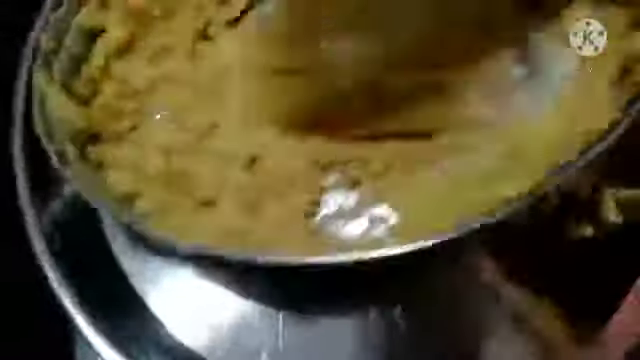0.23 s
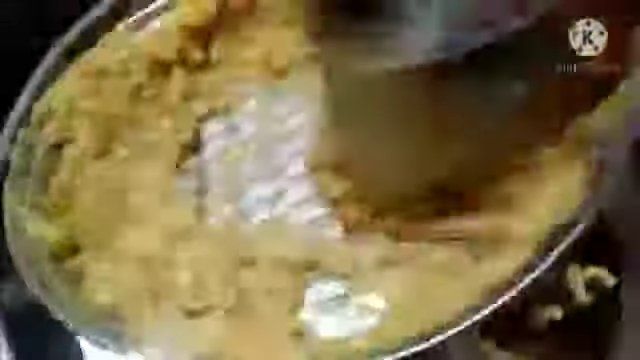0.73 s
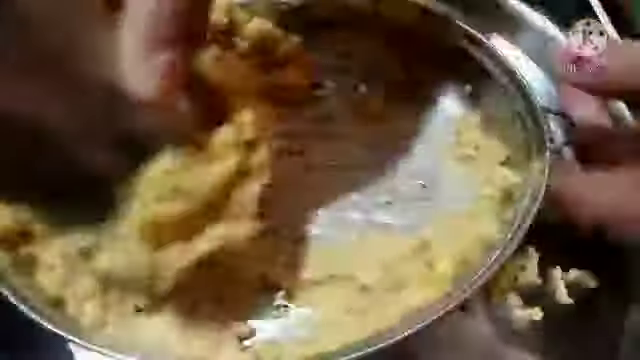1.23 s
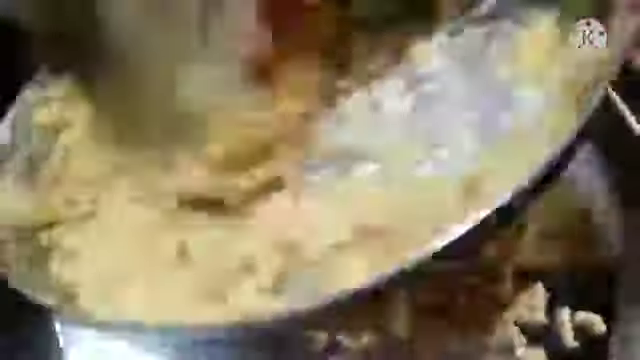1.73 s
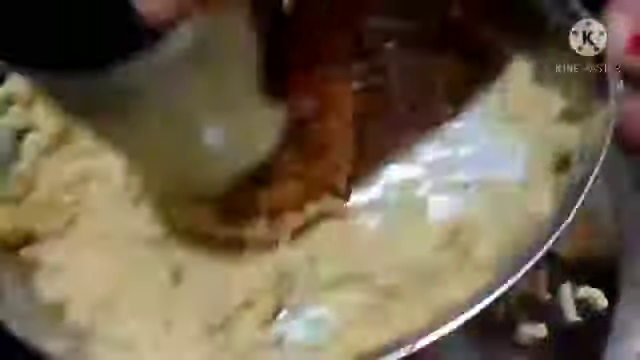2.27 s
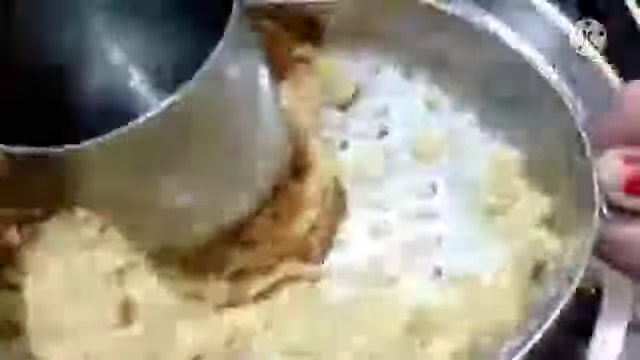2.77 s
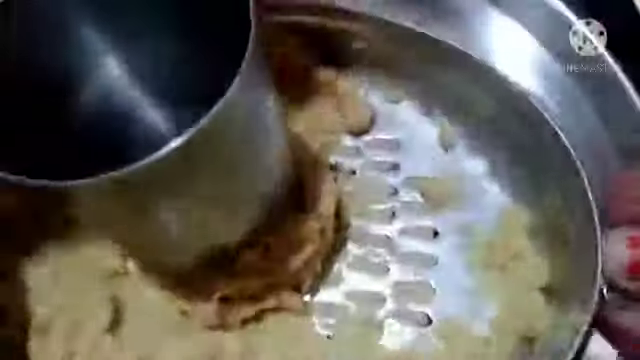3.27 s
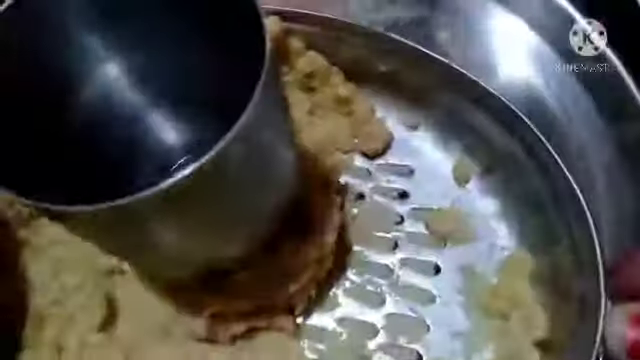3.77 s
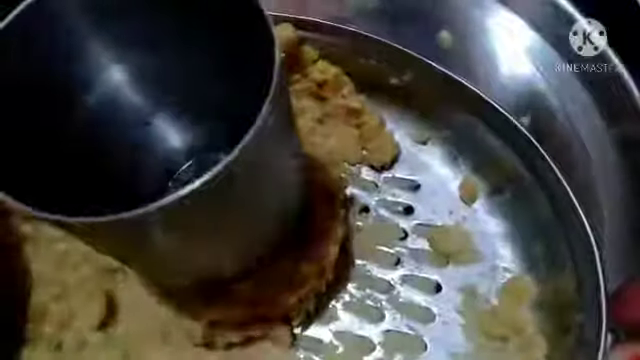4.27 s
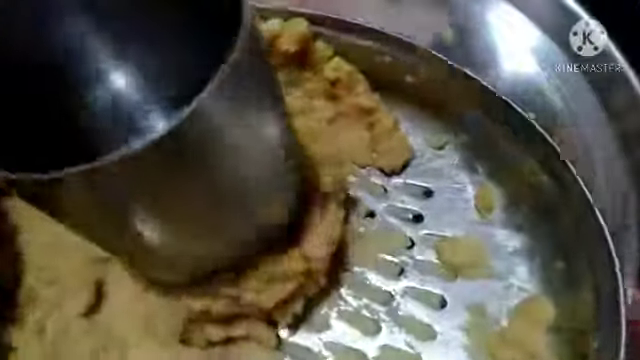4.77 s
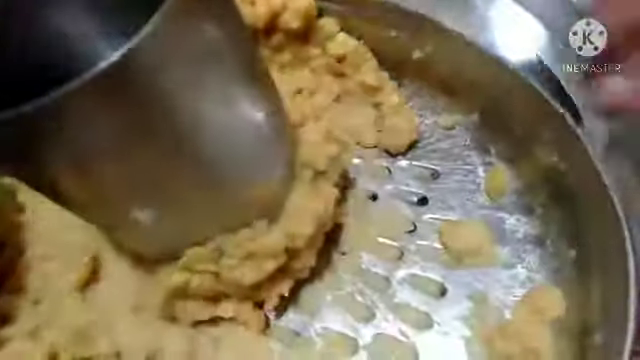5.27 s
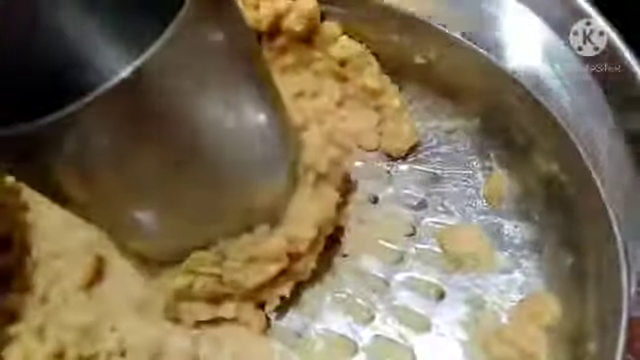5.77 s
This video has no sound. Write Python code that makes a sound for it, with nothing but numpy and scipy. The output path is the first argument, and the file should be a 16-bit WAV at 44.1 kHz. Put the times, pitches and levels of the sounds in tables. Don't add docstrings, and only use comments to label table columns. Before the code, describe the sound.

Fast back-and-forth scraping, gritty and bright, with squeaky chirps across metal holes and a hard knock just before one second. After a short lull, uneven scraping resumes with damped steel clanks and sticky ticks. It thins to low room hum, then five strong raps make the sieve and rim ring. Small ticks and a short scrape end in a dull knock, heard closely in a reverberant kitchen.

```python
import sys
import numpy as np
from scipy import signal
from scipy.fft import rfft, irfft
from scipy.io import wavfile
from scipy.ndimage import uniform_filter1d

SR = 44100
rng = np.random.default_rng(int(sys.argv[2]) if len(sys.argv) > 2 else 0)


def store_pcm(level_fs):
    pcm = np.round(np.clip(level_fs, -1, 1) * 32767).astype(np.int16)
    wavfile.write(sys.argv[1], SR, np.atleast_2d(pcm).T)


def boost(x):
    u = np.asarray(x, float) / 20
    return 10 ** u


N = 265041

# (time [s], length [s], place of most pressure [0-1], friction hiss [dB], sieve floor rumble [dB])
STROKES = [(-.04, 0.16, 0.42, -45.5, -55), (0.091, 0.16, 0.55, -45, -52.5), (0.218, 0.18, 0.37, -45, -54),
           (0.365, 0.22, 0.33, -46.5, -52.5), (0.521, 0.16, 0.35, -40, -46),
           (0.637, 0.17, 0.61, -43, -49.5), (0.788, 0.27, 0.11, -42, -53.5), (0.866, 0.62, 0, -63.5, -74.5),
           (1.232, 0.28, 0.27, -66, -67.5), (1.349, 0.24, 0.15, -50.5, -65),
           (1.483, 0.14, 0.44, -51, -56.5), (1.567, 0.27, 0, -49.5, -51.5), (1.733, 0.22, 0.59, -48, -54.5),
           (1.891, 0.21, 0.51, -51, -58.5), (2.013, 0.23, 0.3, -48, -49.5), (2.177, 0.08, 0.4, -51, -61),
           (2.225, 0.074, 0.65, -54, -63.5), (2.287, 0.27, 0.1, -55.5, -63),
           (4.614, 0.49, 0.21, -75.5, -70.5), (5.16, 0.31, 0.07, -67.5, -71),
           (5.264, 0.22, 0.55, -48, -65.5), (5.402, 0.1, 0.52, -43.5, -59.5),
           (5.478, 0.19, 0.1, -50.5, -68), (5.925, 0.16, 0.31, -56.5, -76)]
# (frequency [Hz], density [dB per Hz])
GRIT_SPECTRUM = [(1470, -45), (2500, -3), (2910, -8), (4470, -2.5), (5700, -1.5), (6300, 7.5), (7340, 3),
                 (12100, -7.5), (14900, -5.5), (15500, 6)]
# (frequency [Hz], level [dB], t60 [s])
SIEVE_MODES = [(997, -20, 0.71), (2350, -20, 0.46), (3400, -11, 0.35), (4680, -20.5, .4), (4460, -2, 0.41),
               (5130, 0, 0.4), (6300, -18, 0.497), (5850, -19, .3), (6110, -6.5, 0.27), (6580, -2.5, 0.2),
               (7060, -3, 0.29), (7160, -26.5, 0.16), (9330, -3, .3), (10240, -16, .3),
               (12930, -25.5, 0.14), (11450, -6.5, 0.22), (13700, 3, 0.16)]

# (time [s], length [s], place of most pressure [0-1], level [dB])
SWEEPS = [(-.03, 0.12, .45, -57), (.1, .14, .5, -58), (.23, .15, .4, -59), (.803, .08, .1, -53),
          (5.292, .12, 0.19, -55), (5.34, .12, .4, -50.5), (5.43, .15, .5, -53), (5.54, .14, .15, -60),
          (5.945, .12, .4, -61)]
# (frequency [Hz], density [dB per Hz])
BARE_SPECTRUM = [(4300, -31), (5200, -3), (7000, -3), (9000, 0.5), (12000, -4), (14000, -1), (15600, 4.5)]

# (time [s], length [s], first rate [Hz], level [dB])
SPEEDING_CHIRPS = [(0.419, 0.034, 516, -54), (0.451, 0.033, 1100, -41.5), (0.724, 0.018, 672, -47),
                   (0.728, 0.038, 1048, -42.5), (1.844, 0.0644, 500, -48.5), (2.096, 0.04, 484, -42.5),
                   (2.122, 0.0067, 707, -36)]
SLOWING_CHIRPS = [(0, 0.017, 1740, -48), (0.268, 0.038, 1796, -45.5), (0.289, 0.046, 892, -51),
                  (0.553, 0.036, 1758, -37), (0.593, 0.0163, 580, -47.5), (0.818, 0.037, 1573, -42.5),
                  (1.978, 0.0097, 586, -47)]
SLIDING_CHIRPS = [(.015, 0.015, 760, -49), (0.029, 0.025, 1480, -46.5), (0.132, 0.016, 1480, -45),
                  (0.143, 0.018, 626, -48), (0.18, 0.02, 1380, -52), (0.824, 0.043, 2020, -48),
                  (1.535, 0.014, 1960, -57), (1.893, 0.0143, 1453, -45), (2.085, 0.051, 1427, -48),
                  (5.353, 0.056, 1218, -61), (5.464, 0.05, 1393, -54), (5.4, 0.04, 2300, -58),
                  (0.045, 0.03, 2100, -52), (0.16, 0.03, 2000, -52), (0.3, 0.03, 1400, -50),
                  (0.6, 0.03, 2300, -50), (5.533, 0.029, 1247, -58.5)]
SPEEDING_OCT_PER_S, SLOWING_OCT_PER_S, SLIDING_OCT_PER_S = 22, -18.5, -1.8

# (time [s], peak [dB], weight behind the blow [dB], room send [dB])
HARD_RAPS = [
    (3.7818, -23.5, 3.5, 2.5),
    (3.9421, -22.5, 0, 0),
    (4.0981, -21, 0, 4),
    (4.2655, -24, -1, 4),
    (4.4203, -19.5, -3, 2.5),
]
BUMPS = [
    (0.8725, -21, 0.33, -18),
    (1.592, -41, 14, -37),
    (1.9794, -57, 21, -27),
    (1.9946, -45, 10.6, -30),
    (3.2922, -45.5, 11, 6),
    (4.115, -36.5, 0.69, -18.5),
]
THUMPS = [
    (2.126, -46.5, 13, -3),
    (3.3072, -39.5, 7.9, 2),
    (3.7735, -52.5, 23, -2.5),
    (6.005, -29.5, 8, -10.5),
]
CLANKS = [(1.5773, -28.5, 9.5, -22.5), (1.6435, -40.5, 11, -11), (2.299, -33, 8, -6),
          (3.0114, -46, 2, -26.5), (3.0766, -52, 4, -20), (1.513, -49, 8, -10), (1.822, -48, 2, -10),
          (1.838, -57, 3, -10), (5.457, -39.5, 3, 0)]
SHARP_CLICKS = [(0.1366, -45.5, 3, 4), (0.835, -37.5, 11.5, 4.5), (0.9033, -39, -5, -24),
                (1.3718, -27.5, 8.5, -42.5), (2.0233, -31, 17.5, -14), (3.016, -42, 8, 7),
                (5.5055, -42, -3, -18), (5.5443, -30, -10, -14)]
DULL_CLICKS = [(0.4629, -33, 7, -21), (0.569, -30.5, -11, -10), (0.8823, -26.5, 8, -24),
               (0.887, -40.5, -13, 11), (1.338, -42.5, 9.5, -7), (1.4216, -33, -2, -24),
               (4.1439, -29.5, 11, 5.5)]
# (under 1.5 kHz [dB], 1.5-4.5 kHz [dB], over 9 kHz [dB])
RAP_COLOUR = (-2.5, 2.7, -5.5)
BUMP_COLOUR = (-1, -2.1, -5.5)
THUMP_COLOUR = (0, -22, -11)
CLANK_COLOUR = (-17.5, 0, -11.5)
SHARP_COLOUR = (-19, -12.5, -6.5)
DULL_COLOUR = (-15.5, -24, -12)

# (time [s], height [dB], frequency [Hz])
LONG_RINGS = [(0.44, -58, 4160), (0.462, -49.5, 4170), (1.585, -55, 3710), (1.6, -55, 4100),
              (1.645, -59, 5400), (3.79, -44, 991), (3.8, -47.5, 2890), (3.79, -42.5, 3370),
              (3.95, -44.5, 2680), (4.11, -46, 3370), (4.28, -49.5, 3050)]
SMEARED_RINGS = [(.875, -39, 6300), (2.3, -48, 3300), (3.018, -46, 3860), (3.05, -50.5, 3560),
                 (3.02, -53, 6500), (3.3, -46.5, 900), (3.305, -49, 5900), (3.79, -46.5, 2230),
                 (3.95, -48, 965), (3.95, -44, 3170), (4.108, -40, 920), (4.13, -46.5, 620),
                 (4.275, -40, 920), (4.275, -47.5, 3250), (4.428, -40, 890), (4.43, -41, 3250)]
FREE_RINGS = [(1.59, -42.5, 3450), (1.76, -55, 2100), (.88, -50, 5400), (3.03, -51, 3830),
              (1.66, -49, 1800), (1.62, -53, 280), (1.62, -53.5, 227), (1.645, -49, 3100),
              (2.022, -43.5, 3360), (3.292, -47, 290)]
HELD_RINGS = [(1.578, -37, 3280), (1.54, -52, 2040), (1.78, -57, 3700), (1.785, -57, 3230),
              (1.85, -54.5, 3960), (2.023, -49, 2818), (2.062, -52, 2497), (2.298, -43.5, 2210),
              (2.298, -40, 3446), (3.02, -50, 5380), (3.02, -46, 6110), (5.457, -45, 3490),
              (5.545, -52, 3510), (3.782, -28.5, 3980), (4.265, -34, 15000), (1.278, -64, 2180)]
MUTED_RINGS = [(0.741, -50, 4240), (3.942, -32, 13200), (2.03, -42, 3050), (5.56, -52, 6100),
               (5.44, -46, 6200), (1.513, -50, 4150), (1.785, -50, 2050), (1.545, -50, 5000),
               (1.278, -50.5, 1060), (2.023, -28, 2110), (2.07, -52, 2150), (2.296, -32, 2970),
               (3.019, -39.5, 4040), (3.291, -35.5, 468), (3.292, -42, 1696), (3.293, -39, 5460),
               (3.773, -32.5, 523), (4.112, -33.5, 485), (4.267, -35.5, 490), (5.258, -54, 625),
               (.874, -41.5, 181), (3.781, -41, 180), (4.098, -45, 194)]
CHOKED_RINGS = [(1.642, -29.5, 2080), (1.643, -32, 2470), (2.025, -22.5, 2466), (3.015, -40, 7800),
                (3.294, -34, 2600), (4.821, -59, 3250), (1.4056, -56, 3860), (1.4784, -56, 3670),
                (6.005, -40, 3550), (6.005, -36, 800), (6.005, -39, 1350)]
LONG_T60_S, SMEARED_T60_S, FREE_T60_S = 0.75, 0.44, 0.42
HELD_T60_S, MUTED_T60_S, CHOKED_T60_S = 0.21, 0.077, 0.055

# (time [s], level [dB])
RAP_RINGS = [
    (3.782, -37),
    (3.941, -42),
    (4.098, -35.5),
    (4.265, -43),
    (4.421, -38),
]
# (frequency [Hz], level [dB], t60 [s])
RIM_MODES = [(3250, -4, 0.3), (4060, -12, .4), (4970, -5, 0.45), (6330, -2, 0.55), (7100, -2, 0.34),
             (7530, -5, 0.36), (8900, -8, 0.33), (10400, -10, 0.26), (11700, -10, 0.28), (13150, -10, .26),
             (14700, -4.5, .26), (15200, -4, .22)]

# (time [s], peak [dB])
TICKS = [(0.737, -30), (0.749, -26.5), (0.7594, -54), (0.856, -20), (1.513, -40.5), (1.5435, -49),
         (1.822, -35.5), (2.2023, -39), (2.214, -40), (2.2507, -38), (2.267, -42), (2.394, -35.5),
         (2.4269, -46), (3.644, -49.5), (4.778, -56), (4.8614, -66), (4.8772, -49.5), (4.906, -61),
         (4.918, -55.5), (5.069, -51), (5.2582, -48.5), (5.273, -57), (5.3008, -49), (5.3083, -46),
         (5.3786, -40), (5.441, -38), (5.696, -56), (5.829, -60), (1.388, -42), (1.71, -48), (2.09, -42),
         (5.7602, -60), (0.806, -42), (5.6102, -61), (5.6883, -52), (5.7283, -60), (5.8222, -60),
         (5.8594, -64)]
# (time [s], peak [dB])
THREADS = [(.043, -46), (.095, -46), (.12, -47), (.131, -47), (.214, -48), (.62, -46), (.665, -46),
           (4.861, -58), (5.822, -55), (5.861, -54)]

# (frequency [Hz], density [dB per Hz])
ROOM_COLOUR = [(140, -46.5), (230, -11), (345, -18), (508, -11), (710, -16.5), (975, -13), (1490, -25),
               (3170, -9), (4360, -12), (6090, -10.5), (8520, -18.5), (15500, -8.5)]
# (frequency [Hz], t60 [s])
ROOM_T60 = [(300, 0.56), (1000, 0.62), (3000, 0.46), (6500, 0.47), (10000, 0.36), (15000, 0.33)]

# (frequency [Hz], density [dB per Hz])
AIR_SPECTRUM = [(68, -47.5), (115, -10.5), (147, -6), (223, -3), (679, -15), (852, -12.5), (1830, -18.5),
                (2030, -19), (2550, -20.5), (4630, -26.5), (6580, -27.5), (12500, -31), (15000, -29),
                (16000, -17)]
# (frequency [Hz], level [dB rms])
FAN_HUM = [(48.4, -59.5), (96.9, -65.5), (226.1, -76), (344.5, -79), (586.8, -83.5), (839.8, -89),
           (1297, -84), (1954, -89), (2056, -78.5), (2105, -85)]
# (time [s], gain [dB])
DUCKING = [
    (0, 1.5),
    (.87, 2),
    (1.15, -9.5),
    (1.6, 3),
    (2.3, 0.5),
    (3.78, 0.5),
    (3.8, -2.5),
    (4.65, -4),
    (5.45, 0),
]
# (time [s], step [full scale])
JOLTS = [
    (0.873, .085),
    (3.78, 0.083),
    (3.943, -0.0025),
    (4.096, -0.013),
    (4.265, .0015),
    (4.419, 0.064),
]
# (frequency [Hz], width [Hz], boost [dB])
MIC_PEAKS = [(6350, 2200, 4), (15000, 4000, 4)]


def at_hz(points, hz):
    points_hz, values = np.transpose(points)
    return np.interp(np.log(np.maximum(hz, 1)), np.log(points_hz), values)


def rms_one(x):
    return x / np.sqrt(np.mean(x ** 2) + 1e-20)


def coloured(x, spectrum):
    gain = boost(at_hz(spectrum, np.fft.rfftfreq(len(x), 1 / SR)))
    return rms_one(irfft(rfft(x) * gain, len(x)))


def band(x, low_hz, high_hz):
    sos = signal.butter(2, [low_hz, min(high_hz, .45 * SR)], "band", fs=SR, output="sos")
    return signal.sosfilt(sos, x)


def grains(per_s, spread_db):
    sizes = boost(spread_db * np.minimum(rng.exponential(1, N), 5)) * rng.choice([-1, 1], N)
    return sizes * (rng.random(N) < per_s / SR)


def clicks(times, peaks_db):
    out = np.full(N, 1e-18)
    at = np.minimum((np.asarray(times) * SR).astype(int), N - 1)
    np.add.at(out, at, boost(peaks_db))
    return out


def bursts(times, peaks_db, t60):
    envelope = signal.lfilter([1], [1, -boost(-60 / (t60 * SR))], clicks(times, peaks_db))
    return envelope * rng.standard_normal(N)


def ring(s, height_db, hz, t60, blur, count=6):
    out, start = np.zeros(N), int(s * SR)
    t = np.arange(min(N - start, int(t60 * SR) * 4 // 5), dtype=np.float32) / SR
    spread = rng.standard_normal((count, 1))
    crowd_hz = hz * (1 + blur * (spread - spread.mean()))
    offset = rng.uniform(0, 2.6, (count, 1))
    turns = (2 * np.pi * crowd_hz).astype(np.float32) * t + offset.astype(np.float32)
    decay = boost(height_db - 60 * t / t60)
    out[start:start + len(t)] = 0.61 / np.sqrt(count) * decay * np.sin(turns).sum(axis=0)
    return out


def pressure(strokes, levels_db):
    t = np.arange(N // 16 + 2) * 16 / SR
    out = np.zeros(len(t))
    for (s, length, place, *_), level_db in zip(strokes, levels_db):
        corners = s + length * np.array([0, np.clip(place, .05, .95), 1])
        swell = np.sin(np.interp(t, corners, [0, np.pi / 2, np.pi]))
        out += boost(level_db) * np.abs(swell) ** 2.22
    return np.interp(np.arange(N) / SR, t, out)


def scrape():
    judder = boost(1.8 * rms_one(band(rng.standard_normal(N), 30, 150)))
    grit = coloured(grains(10000, spread_db=3.2) * judder, GRIT_SPECTRUM)
    singing = 0
    for hz, mode_db, t60 in SIEVE_MODES:
        r = boost(-60 / (.05 * t60 * SR))
        w = 2 * np.pi * hz / SR
        mode = signal.lfilter([1 - r], [1, -2 * r * np.cos(w), r * r], grit)
        singing = singing + boost(mode_db) * np.sin(w) * mode
    grit = grit + 0.19 * rms_one(singing)
    rumble = rms_one(band(grains(2200, spread_db=3.5) * judder ** .5, 650, 2360))
    rumble += 0.2 * rms_one(band(grains(320, spread_db=3.0), 162, 350))
    hiss_db, rumble_db = np.transpose(STROKES)[3:]
    top_db = hiss_db - 2 + 0.077 * (rumble_db - hiss_db)
    hiss = pressure(STROKES, hiss_db) * band(grit, 1940, 8530)
    top = 1.5 * pressure(STROKES, top_db) * band(grit, 6920, 14600)
    return hiss + top + pressure(STROKES, rumble_db) * rumble


def sweep():
    hiss = coloured(grains(14000, spread_db=2.6), BARE_SPECTRUM)
    edges = 4000 * 2 ** np.arange(0, 2.1, .4)
    flicker = rng.standard_normal((len(edges) - 1, N // 600 + 2))
    patches = 0
    for k, (low, high, drift) in enumerate(zip(edges, edges[1:], flicker)):
        drift_db = 3.0 * np.interp(np.arange(N) / 600, np.arange(len(drift)), drift)
        patches = patches + band(hiss, low, high) * boost(drift_db) * (-1) ** k
    return pressure(SWEEPS, np.transpose(SWEEPS)[3]) * rms_one(patches)


def chirps():
    out = np.zeros(N)
    kinds = [(SPEEDING_CHIRPS, SPEEDING_OCT_PER_S), (SLOWING_CHIRPS, SLOWING_OCT_PER_S),
             (SLIDING_CHIRPS, SLIDING_OCT_PER_S)]
    for rows, glide in kinds:
        for s, length, first_hz, level_db in rows:
            u = np.linspace(0, 1, int(length * SR))
            wobble = np.interp(u, np.linspace(0, 1, 16), rng.standard_normal(16))
            lumps = np.interp(u, np.linspace(0, 1, 12), rng.standard_normal(12))
            rate_hz = first_hz * 2 ** (glide * length * u) * (1 + .23 * wobble)
            turn = 2 * np.pi * np.cumsum(rate_hz) / SR
            tone = np.sin(turn) + 0.16 * np.sin(2 * turn)
            swell = boost(level_db + 4.5 * lumps) * np.sin(np.pi * u) ** .7
            out[int(s * SR):int(s * SR) + len(u)] += swell * tone
    return out


def knocks():
    kinds = [(HARD_RAPS, RAP_COLOUR), (BUMPS, BUMP_COLOUR), (THUMPS, THUMP_COLOUR), (CLANKS, CLANK_COLOUR),
             (SHARP_CLICKS, SHARP_COLOUR), (DULL_CLICKS, DULL_COLOUR)]
    blows = []
    for rows, (low_db, mid_db, high_db) in kinds:
        for s, peak_db, weight_db, send_db in rows:
            blows.append((s, peak_db, low_db + weight_db, mid_db + weight_db, high_db, send_db))
    return np.transpose(blows)


def crack(s, peak_db, low_db, mid_db, high_db):
    out = 1.0 * band(bursts(s, peak_db + low_db, t60=0.072), 58, 235)
    out += 1.91 * band(bursts(s, peak_db + low_db, t60=0.034), 370, 1550)
    out += 1.19 * band(bursts(s, peak_db + mid_db, t60=0.029), 1250, 3600)
    out += 1.56 * band(bursts(s, peak_db, t60=0.03), 5270, 7360)
    out += 1.3 * band(bursts(s, peak_db + high_db + 1.5, t60=0.007), 11500, 15500)
    out += 1.7 * band(bursts(s, peak_db + high_db, t60=0.022), 7700, 25000)
    return out + 1.1 * band(bursts(s, peak_db + high_db, t60=0.0066), 16000, 27000)


def partials():
    kinds = [(LONG_RINGS, LONG_T60_S, .005), (SMEARED_RINGS, SMEARED_T60_S, .035), (FREE_RINGS, FREE_T60_S, .014),
             (HELD_RINGS, HELD_T60_S, .014), (MUTED_RINGS, MUTED_T60_S, .016), (CHOKED_RINGS, CHOKED_T60_S, .021)]
    return sum(ring(*row, t60, blur, count=10) for rows, t60, blur in kinds for row in rows)


def rapped(modes, blur, count):
    out = np.zeros(N)
    for s, rap_db in RAP_RINGS:
        for hz, mode_db, t60 in modes:
            chance_db = 3 * rng.standard_normal()
            out += ring(s, rap_db + mode_db + chance_db, hz, t60, blur, count)
    return out


def sieve():
    return rapped(SIEVE_MODES, blur=0.05, count=14)


def rim():
    return rapped(RIM_MODES, blur=0.012, count=11)


def ticks():
    s, peak_db = np.transpose(TICKS)
    top_db = -56 + 0.49 * (peak_db + 50)
    threads = band(bursts(*np.transpose(THREADS), t60=0.008), 10500, 16000)
    snaps = 1.02 * band(bursts(s, peak_db, t60=0.013), 5340, 7530)
    return threads + snaps + 1.17 * band(bursts(s, top_db, t60=0.0078), 7800, 17000)


def into_room(s, peak_db, low_db, mid_db, high_db):
    out = 26 * band(clicks(s, peak_db + low_db), 180, 1500)
    out -= 17 * band(clicks(s, peak_db + mid_db), 1220, 3330)
    out += 15 * band(clicks(s, peak_db), 5160, 8400)
    return out - 13 * band(clicks(s, peak_db + high_db), 8900, 18000)


def room_tail():
    t = np.arange(int(.7 * SR)) / SR
    edges = 200 * 2 ** np.arange(0, 6.6, .5)
    tail = 0
    for low, high in zip(edges, edges[1:]):
        decay = boost(-60 * t / at_hz(ROOM_T60, np.sqrt(low * high)))
        tail = tail + band(rng.standard_normal(len(t)), low, high) * decay
    build_up = 1 - np.exp(-t / 0.00092)
    return coloured(tail * build_up, ROOM_COLOUR) / np.sqrt(len(t))


def kitchen(x):
    place = (np.arange(N) // int(.16 * SR) + 1) % 4
    return sum(signal.fftconvolve(x * (place == k), room_tail())[:N] for k in range(4))


def background():
    t = np.arange(N) / SR
    waver = np.cumsum(band(rng.standard_normal(N), 0.49, 19)) * 0.004
    hum = 0
    for k, (hz, level_db) in enumerate(FAN_HUM):
        line = np.sin(2 * np.pi * hz * t + waver * np.sqrt(hz / 400) + k)
        hum = hum + np.sqrt(2) * boost(level_db) * line
    air = boost(-63.5) * coloured(rng.standard_normal(N), AIR_SPECTRUM)
    air += boost(-70.5) * rms_one(band(rng.standard_normal(N), 22, 78))
    duck_s, duck_db = np.transpose(DUCKING)
    return boost(np.interp(t, duck_s, duck_db)) * (hum + air)


def scene():
    s, peak_db, low_db, mid_db, high_db, send_db = knocks()
    blows = crack(s, peak_db, low_db, mid_db, high_db)
    sent = into_room(s, peak_db + send_db, low_db, mid_db, high_db)
    rings = partials() + sieve() + rim()
    rubbing = scrape() + sweep() + chirps() + ticks()
    room = kitchen(boost(-5.0) * sent + boost(-13.5) * rings + boost(-19.0) * rubbing)
    return (blows + rings + rubbing + room + background())[None]


def baseline():
    settle_hz, damping = 2.8, 0.79
    w = 2 * np.pi * settle_hz
    wd = w * np.sqrt(1 - damping ** 2)
    out = np.zeros(N)
    for s, step in JOLTS:
        start = int(s * SR)
        t = np.arange(N - start) / SR
        swing = np.cos(wd * t) - damping * w / wd * np.sin(wd * t)
        out[start:] = step * np.exp(-damping * w * t) * swing
    return signal.lfilter([.02], [1, -.98], out)


def top_cut(x):
    return signal.sosfilt(signal.butter(12, 16810, fs=SR, output="sos"), x)


def record(dry):
    cutoff_hz, attack_top_hz = 15620, 16800
    x = dry
    for hz, width_hz, db in MIC_PEAKS:
        x = x + (boost(db) - 1) * signal.lfilter(*signal.iirpeak(hz, hz / width_hz, fs=SR), x)
    x = x + baseline()
    body = signal.sosfilt(signal.ellip(12, .5, 60, cutoff_hz, fs=SR, output="sos"), x)
    top = signal.sosfilt(signal.ellip(4, .5, 40, [cutoff_hz, attack_top_hz], "band", fs=SR, output="sos"), x)
    fast = uniform_filter1d(top ** 2, 300)
    slow = uniform_filter1d(top ** 2, 3000)
    attack = uniform_filter1d(1. * (fast > 3.5 * slow), 200)
    return top_cut(body + boost(-26) * attack * top)


dry = scene()
out = record(dry)
store_pcm(out)
```